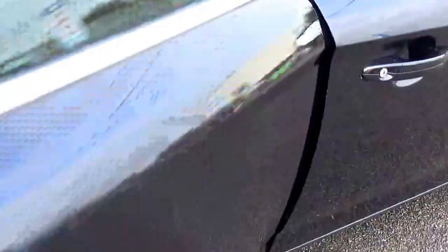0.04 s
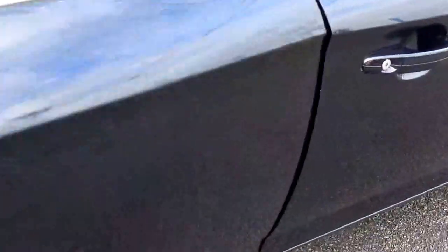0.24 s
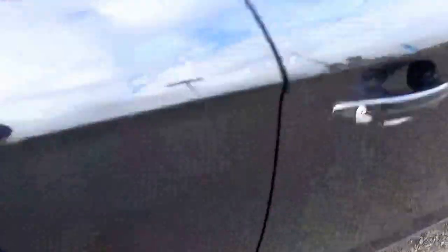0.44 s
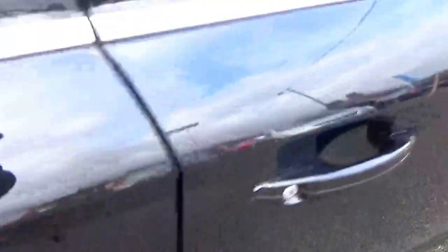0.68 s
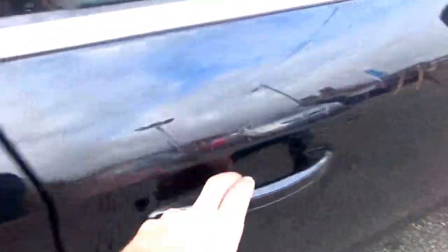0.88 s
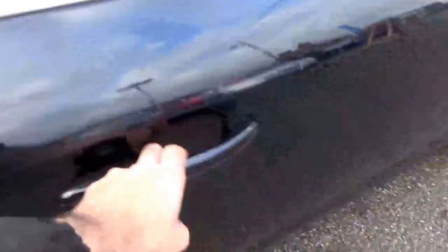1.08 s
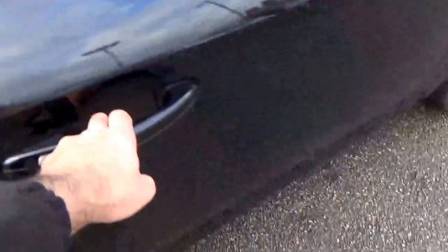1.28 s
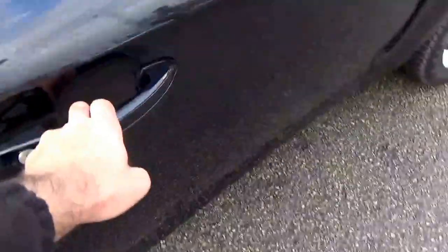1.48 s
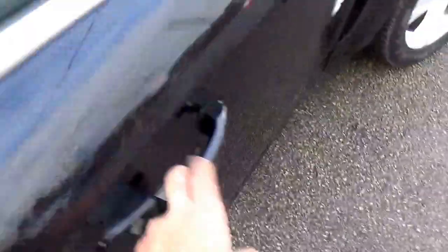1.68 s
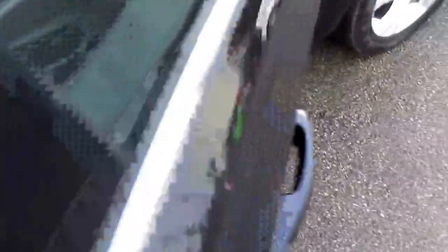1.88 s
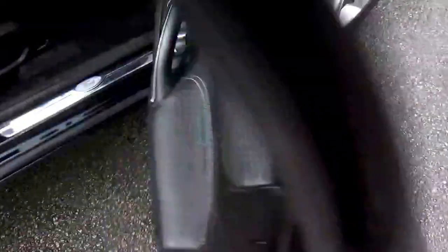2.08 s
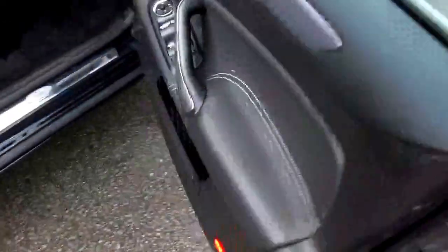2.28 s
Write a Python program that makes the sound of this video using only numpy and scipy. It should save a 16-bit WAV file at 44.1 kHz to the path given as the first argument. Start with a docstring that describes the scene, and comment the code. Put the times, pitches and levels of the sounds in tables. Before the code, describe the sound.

Car doors outdoors: one slams shut, another unlatches and opens over faint distant traffic.

```python
"""A car's front door swings shut, to the left: its latch catches in a quick run of impacts, each of
which excites the damped modes of the door. A hand pulls the rear door's handle, which creaks by
stick-slip friction; the latch lets go with a clunk, and the door swings open with a soft rub and a
few ticks. The yard returns a faint reverberation, and the tyre noise of far-off traffic fades away."""
import sys
import numpy as np
from scipy import signal
from scipy.fft import rfft, irfft, next_fast_len
from scipy.io import wavfile
from scipy.ndimage import uniform_filter1d

SR = 44100
rng = np.random.default_rng(int(sys.argv[2]) if len(sys.argv) > 2 else 0)


def store_wav(level_fs):
    """Save 16-bit WAV to argv[1]."""
    pcm = np.round(np.clip(np.atleast_2d(level_fs), -1, 1) * 32767)
    wavfile.write(sys.argv[1], SR, pcm.T.astype(np.int16))


N = 103502
TIME = np.arange(N) / SR
BANDS_HZ = 32 * 2 ** (np.arange(26) / 3)
IMPACT_HZ = (90, 280, 750, 1500, 3500, 9500)
ATTACK_S, ATTACK_CYCLES = 0.0004, 0.83

# Impacts of shutting: (time [s], octave level [dB] at each of IMPACT_HZ)
SHUT_IMPACTS = [(0.4230, -70, -14, -21.5, -21, -21.5, -36.5), (0.4303, -56, -27, -24, -28, -26, -49),
                (0.4352, -27, -29.5, -13, -27, -27, -25.5), (0.4455, -33, -21, -49, -19, -24, -30.5),
                (0.4630, -23.5, -22, -22.5, -23, -28.5, -52), (0.4930, -24, -31, -27, -39, -68, -60)]
# Dense ring: (frequency [Hz], contact T60 [s], body T60 [s], body level [dB])
FRONT_DECAY = [(91, 0.18, 1, -20.5), (267, 0.048, 0.3, -7), (790, 0.076, 0.25, -4),
               (1620, 0.0099, 0.17, -8), (3620, 0.059, 0.11, -9.5), (9700, 0.075, 0.15, -3)]
# Panel modes: (frequency [Hz], level relative to the impact [dB])
FRONT_PANEL = [(118, -6.5), (187, -6), (262, -8.5), (298, -6), (348, -6.5), (395, -9.5), (560, -7.5),
               (720, -11), (799, -8.5), (1060, -8), (1280, -5), (3015, -11.5), (3658, -9.5), (4607, -8)]
# Latch parts hitting their stops: (time [s], frequency [Hz], level [dB], T60 [s])
FRONT_LATCH = [(0.4236, 1307, -7.5, 0.011), (0.4303, 1410, -9.5, 0.018), (0.4355, 553, -12.5, 0.042),
               (0.4632, 830, -5, 0.031), (0.5235, 800, -26, .025)]
# Direction: (frequency [Hz], left minus right [dB])
FRONT_BALANCE = [(100, -2), (300, 3), (750, 5.5), (2500, 5), (9000, .3)]
# Likeness of left and right: (frequency [Hz], coherence [0-1])
FRONT_COHERENCE = [(200, 1), (900, 0.72), (3500, 0.26), (9000, 0.74)]
def front_door():
    """Impact excitation: the door meets its seal and latches, and each blow sets it vibrating."""
    ring = dense_ring(SHUT_IMPACTS, FRONT_DECAY, FRONT_COHERENCE, FRONT_BALANCE, yard_db=-28.5)
    modes = panel(SHUT_IMPACTS, FRONT_PANEL, FRONT_BALANCE) + knocks(FRONT_LATCH, FRONT_BALANCE)
    return from_db(-2) * ring + modes + cracks(SHUT_IMPACTS, FRONT_BALANCE, level_db=-7.5)


# Impacts of the handle's linkage, then of the latch letting go:
# (time [s], octave level [dB] at 280, 750, 1500, 3500, 9500 Hz)
PULL_IMPACTS = [(1.2288, -43.5, -42, -37.5, -43, -38.5), (1.2650, -33, -34.5, -35, -43.5, -37),
                (1.2762, -26, -30, -35, -37, -28), (1.3590, -44.5, -28.5, -37.5, -32.5, -81)]
RELEASE_IMPACTS = [(1.7910, -18, -18.5, -14.5, -30.5, -17.5), (1.7950, -19.5, -47, -24, -20, -68),
                   (1.804, -43, -16, -19.5, -35, -54), (1.8073, -54, -40, -38, -67, -24),
                   (1.833, -32, -24.5, -39, -71, -66)]
# Dense ring: (frequency [Hz], contact T60 [s], body T60 [s], body level [dB])
REAR_DECAY = [(90, 0.038, 0.31, -20.5), (275, 0.087, 0.39, -7), (816, 0.039, .25, -6.5),
              (2920, 0.047, 0.083, -5), (9150, 0.035, 0.1, -27)]
# Panel modes: (frequency [Hz], level relative to the impact [dB])
REAR_PANEL = [(290, -4.5), (347, -5.5), (410, -8), (517, -7), (632, -9.5), (943, -7.5), (1025, -10),
              (1238, -10), (1370, -21), (1480, -10), (1715, -7)]
# Latch parts hitting their stops: (time [s], frequency [Hz], level [dB], T60 [s])
REAR_LATCH = [(1.2785, 292, -19, 0.044), (1.2800, 625, -34, 0.22), (1.3595, 457, -23, 0.039),
              (1.3595, 1680, -34, 0.06), (1.3620, 776, -33, 0.081), (1.6280, 620, -40, .06),
              (1.7915, 271.7, -12.5, 0.061), (1.8041, 948, -11, 0.07)]
# Direction: (frequency [Hz], left minus right [dB])
REAR_BALANCE = [(200, -0.8), (2000, 1), (9000, 1)]
# Likeness of left and right: (frequency [Hz], coherence [0-1])
REAR_COHERENCE = [(200, 1), (1200, 0.83), (5000, 0.82)]
def rear_door():
    """Impact excitation: the handle takes up its linkage, the latch lets go, and the door rings."""
    impacts = PULL_IMPACTS + RELEASE_IMPACTS
    ring = dense_ring(impacts, REAR_DECAY, REAR_COHERENCE, REAR_BALANCE, yard_db=-28.5)
    modes = panel(impacts, REAR_PANEL, REAR_BALANCE) + knocks(REAR_LATCH, REAR_BALANCE)
    pull = cracks(PULL_IMPACTS, REAR_BALANCE, level_db=-6.5)
    release = cracks(RELEASE_IMPACTS, REAR_BALANCE, level_db=-4.5)
    return ring + modes + pull + release


def impact_db(levels, hz, bass_edge_hz=145):
    """Radiation loss: an impact's spectrum falls below its lowest column, and again in the deep bass."""
    columns_hz = IMPACT_HZ[-len(levels):]
    fall_db = 9 * np.maximum(np.log2(columns_hz[0] / hz), 0)
    return at_hz(zip(columns_hz, levels), hz) - fall_db - 10 * np.log10(1 + (bass_edge_hz / hz) ** 4)


def dense_ring(impacts, decays, coherence, balance, yard_db):
    """Modal overlap: countless modes merge into noise; contact, body and yard echo add in power."""
    out, t = np.zeros((2, N)), TIME[:SR]
    for hz in BANDS_HZ:
        contact_t60, body_t60, body_db = (at_hz(decays, hz, column) for column in (1, 2, 3))
        body = from_db(body_db) * decay(t, body_t60)
        yard_t60 = 0.8 / np.sqrt(1 + hz / 5000)
        yard = from_db(yard_db) * decay(t, yard_t60) * (1 - np.exp(-t / 0.035))
        envelope = decay(t, contact_t60) ** 2 + body ** 2 + yard ** 2
        envelope *= 1 - np.exp(-(t / (ATTACK_S + ATTACK_CYCLES / hz)) ** 2)
        envelope *= from_db(-3 / (1 + (hz / 800) ** 2)) ** 2  # low down, a few strong modes take over
        power = np.zeros(N)
        for start, *levels in impacts:
            add(power, start, envelope * from_db(impact_db(levels, hz)) ** 2)
        out += np.sqrt(power / 3) * panned(balance, hz) * band_noise(hz, coherence, evenness=0.33)
    return out


def panel(impacts, modes, balance):
    """Free vibration: each impact rings the panel's strong modes, and the higher ones die sooner."""
    out, t = np.zeros((2, N)), TIME[:SR // 2]
    for hz, db in modes:
        t60 = 0.18 * (300 / hz) ** 0.32
        mode = np.sin(2 * np.pi * hz * t) * decay(t, t60) * (1 - np.exp(-2 * hz * t))
        tone = panned(balance, hz) * trimmed_below(mode, hz)
        for start, *levels in impacts:
            add(out, start, tone * from_db(db + impact_db(levels, hz)))
    return out


def knocks(parts, balance, rise_s=0.00076):
    """Damped oscillation: each struck latch part rings briefly at its natural frequency."""
    out, t = np.zeros((2, N)), TIME[:SR // 4]
    for start, hz, db, t60 in parts:
        note = np.sin(2 * np.pi * hz * t) * decay(t, t60) * (1 - np.exp(-t / rise_s))
        add(out, start, from_db(db) * panned(balance, hz) * trimmed_below(note, hz))
    return out


def trimmed_below(note, hz):
    """High-pass: a ringing part gives off little below its own note."""
    return signal.sosfilt(signal.butter(2, hz / 2, "high", fs=SR, output="sos"), note)


def cracks(impacts, balance, level_db, size=2048):
    """Contact transient: each impact begins with one minimum-phase pulse shaped by its spectrum."""
    out, hz = np.zeros((2, N)), np.maximum(np.fft.rfftfreq(size, 1 / SR), 10)
    for start, *levels in impacts:
        gain = from_db(impact_db(levels, hz) + level_db) * np.sqrt(SR * 50 / hz)
        cepstrum = irfft(np.log(gain * panned(balance, hz)))
        cepstrum[:, 1:size // 2] *= 2  # folding onto positive time makes the pulse causal
        cepstrum[:, size // 2 + 1:] = 0
        add(out, start + ATTACK_S, irfft(np.exp(rfft(cepstrum))))
    return out


# Light contacts: (time [s], octave level [dB] at 1500, 3500, 9500 Hz)
TICK_IMPACTS = [(0.3780, -42, -51.5, -46), (0.8708, -34.5, -49.5, -39), (1.0450, -42, -53, -56.5),
                (1.0628, -29.5, -52.5, -73), (1.0895, -62, -66, -42.5), (1.3245, -46, -48, -47),
                (1.9165, -35, -50, -41), (1.9638, -37, -38, -37), (2.0085, -30.5, -47.5, -45.5)]
# Dense ring: (frequency [Hz], contact T60 [s], body T60 [s], body level [dB])
TICK_DECAY = [(1500, 0.0081, 0.19, -13.5), (9500, 0.0072, 0.038, -4)]
def ticks():
    """Light impacts: fingers and door fittings excite mainly high, short-lived modes."""
    ring = dense_ring(TICK_IMPACTS, TICK_DECAY, REAR_COHERENCE, REAR_BALANCE, yard_db=-22.5)
    return ring + cracks(TICK_IMPACTS, REAR_BALANCE, level_db=-2)


# Strength of the creak: (time [s], level [dB])
CREAK_LEVEL = [(1.571, -55), (1.585, -44.5), (1.626, -50)]
# Its spectrum: (frequency [Hz], octave level [dB])
CREAK_SPECTRUM = [(40, -52), (3800, -12), (5200, -1), (10000, -0.5)]
def handle_creak(slips_per_s=220, jitter=0.061):
    """Stick-slip friction: the held handle gives a short, fairly even run of bright ticks."""
    slips = CREAK_LEVEL[0][0] + np.cumsum(1 + jitter * rng.standard_normal(size=40)) / slips_per_s
    bursts = np.zeros(N)
    for start in slips[slips < CREAK_LEVEL[-1][0]]:
        add(bursts, start, decay(TIME[:SR // 20], t60=0.0085))
    return bursts * in_time(CREAK_LEVEL) * shaped_noise(CREAK_SPECTRUM, REAR_COHERENCE)


# Rub of the opening door: (time [s], level [dB])
SWING_LEVEL = [(1.84, -62), (1.9, -53.5), (2.01, -50), (2.025, -77), (2.25, -79)]
# Its spectrum: (frequency [Hz], octave level [dB])
SWING_SPECTRUM = [(40, -43), (1500, 2.5), (3000, -11), (8000, -2), (11000, -7)]
def door_swing():
    """Sliding friction: the rear door rubs with a coarse grain as it swings out."""
    return rub(SWING_LEVEL, SWING_SPECTRUM, rough_db=5)


# Rub of hand and sleeve: (time [s], level [dB])
HAND_LEVEL = [(1.16, -64.5), (1.24, -57), (1.42, -91), (1.53, -61.5), (1.74, -68), (1.79, -49.5)]
# Its spectrum: (frequency [Hz], octave level [dB])
HAND_SPECTRUM = [(40, -31), (400, 4), (2000, -6.5), (9500, 0)]
def hand_rustle():
    """Sliding friction: hand and sleeve make a smooth, broadband rustle."""
    return rub(HAND_LEVEL, HAND_SPECTRUM, rough_db=1.5)


def rub(level, spectrum, rough_db):
    """Amplitude modulation: friction noise catches and slips a few hundred times a second."""
    grain = uniform_filter1d(rng.standard_normal(N), size=130)
    roughness = from_db(rough_db * grain / grain.std())
    touching = uniform_filter1d(1. * (TIME > level[0][0]) * (TIME < level[-1][0]), size=400)
    return touching * in_time(level) * roughness * shaped_noise(spectrum, REAR_COHERENCE)


# Fading traffic: (time [s], level [dB])
TRAFFIC_LEVEL = [(0.0, -41.5), (1.43, -49.5), (2.35, -52)]
# Spectra of the tyres and of the hiss: (frequency [Hz], octave level [dB])
TYRE_SPECTRUM = [(30, -53), (60, -53), (110, -21), (170, -22.5), (300, -13.5), (550, -10.5), (900, -0.5),
                 (1400, -2.5), (2200, -11.5), (4500, -33), (10000, -31)]
HISS_SPECTRUM = [(30, -87), (110, -71.5), (1000, -82), (3000, -69), (6000, -74), (9500, -70)]
# Likeness of left and right: (frequency [Hz], coherence [0-1])
AIR_COHERENCE = [(250, 1), (700, 0.93), (1500, 0.58), (9000, 0.65)]
def distant_traffic():
    """Rolling noise: far-off tyres fade, slightly to the right, over a faint steady hiss."""
    tyres = in_time(TRAFFIC_LEVEL) * shaped_noise(TYRE_SPECTRUM, AIR_COHERENCE)
    return tyres * from_db([[-.6], [.6]]) + shaped_noise(HISS_SPECTRUM, AIR_COHERENCE)


def shaped_noise(spectrum, coherence):
    """Power summation: three independent bands make up each octave of a steady noise."""
    return sum(from_db(at_hz(spectrum, hz)) * band_noise(hz, coherence) for hz in BANDS_HZ) / np.sqrt(3)


def band_noise(hz, coherence, evenness=0):
    """Partial coherence: mid and side noise form a stereo third-octave band of unit rms."""
    length = next_fast_len(N)
    octaves = np.log2((np.arange(length // 2 + 1) * SR / length + 1) / hz)
    passband = np.cos(np.clip(3 * octaves, -1, 1) * np.pi / 2)
    white = rng.standard_normal((2, 2, len(passband)))
    analytic = np.fft.ifft((white[0] + 1j * white[1]) * passband, length)[:, :N]
    noise = (analytic / (abs(analytic) + 1e-15) ** evenness).real  # evenness flattens chance swells
    mid, side = noise / noise.std(axis=1, keepdims=True)
    alike = np.clip(at_hz(coherence, hz), 0, .995)
    return np.sqrt((1 + alike) / 2) * mid + np.sqrt((1 - alike) / 2) * np.array([side, -side])


def from_db(db):
    """Amplitude ratio of a level in decibels."""
    return 10 ** (np.asarray(db) / 20)


def decay(t, t60):
    """Exponential damping: 60 dB in t60 seconds."""
    return from_db(-60 * t / t60)


def at_hz(points, hz, column=1):
    """Interpolation of a table column on a log-frequency axis."""
    points = np.array(list(points))
    return np.interp(np.log(hz), np.log(points[:, 0]), points[:, column])


def in_time(levels):
    """Amplitude envelope of a level curve."""
    return from_db(np.interp(TIME, *np.transpose(levels)))


def panned(balance, hz):
    """Interchannel level difference: left and right gain at a frequency."""
    return from_db(at_hz(balance, hz) * np.array([[.5], [-.5]]))


def add(out, start_s, sound):
    """Superposition of a delayed sound."""
    start = int(start_s * SR)
    out[..., start:start + sound.shape[-1]] += sound[..., :N - start]


def scene():
    """Superposition: the doors, the hand and the traffic add in pressure."""
    doors = front_door() + rear_door() + door_swing()
    return doors + ticks() + handle_creak() + hand_rustle() + distant_traffic()


def record(dry, cutoff_hz=11000):
    """Band limiting: an elliptic low-pass cuts the top steeply."""
    return signal.sosfilt(signal.ellip(10, .2, 70, cutoff_hz, fs=SR, output="sos"), dry)


dry = scene()
out = record(dry)
store_wav(out)
```